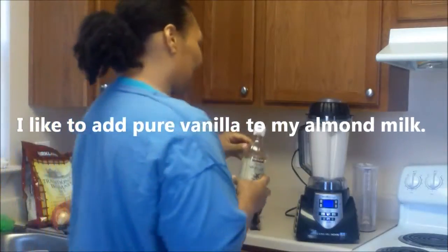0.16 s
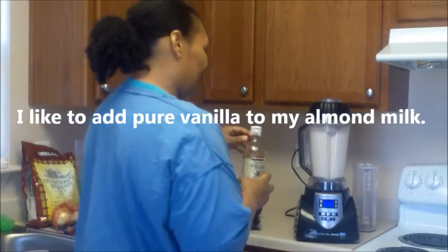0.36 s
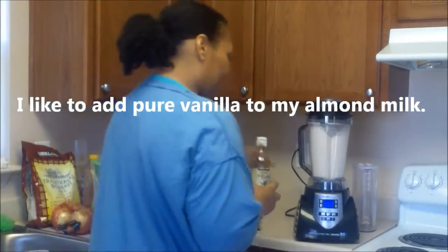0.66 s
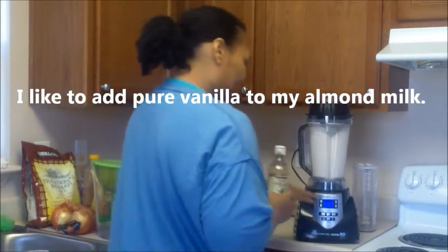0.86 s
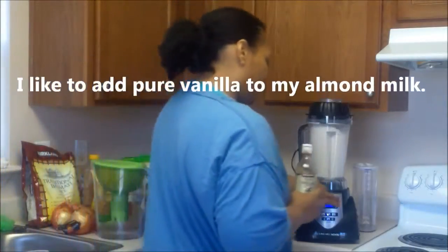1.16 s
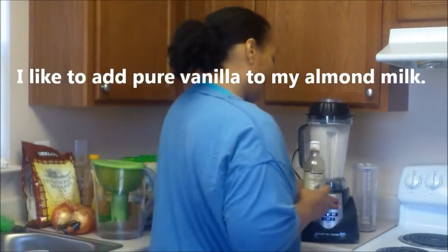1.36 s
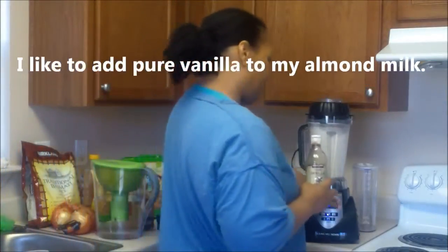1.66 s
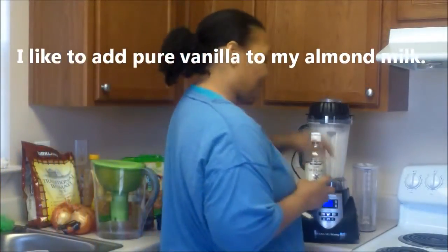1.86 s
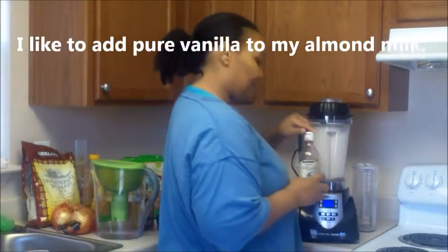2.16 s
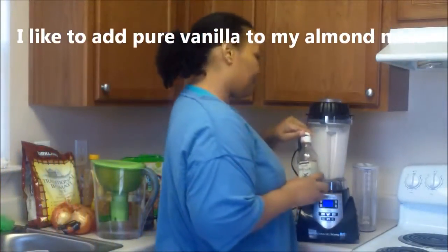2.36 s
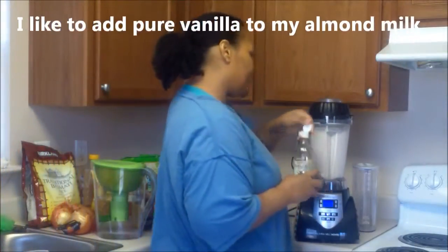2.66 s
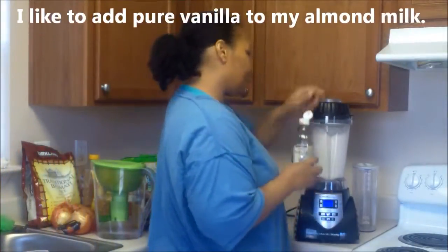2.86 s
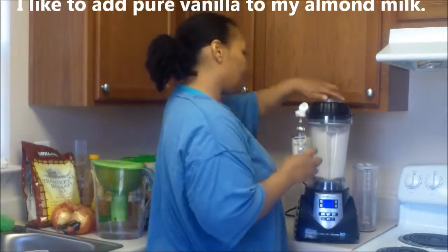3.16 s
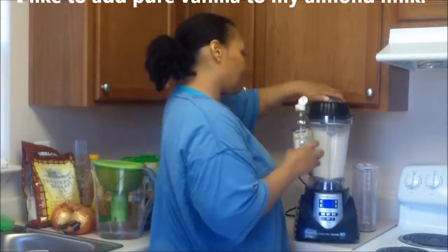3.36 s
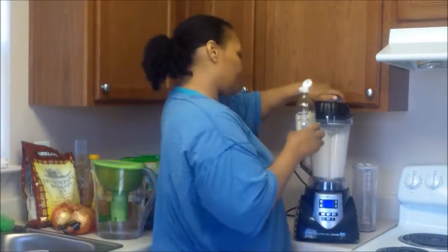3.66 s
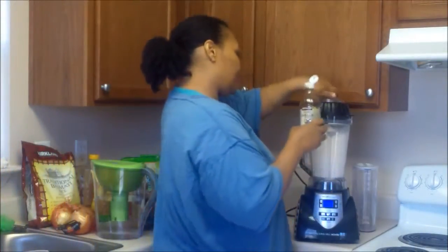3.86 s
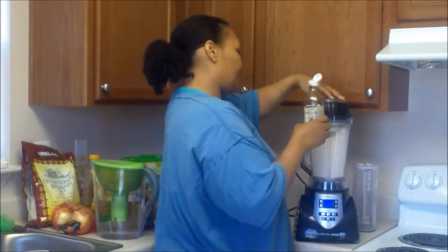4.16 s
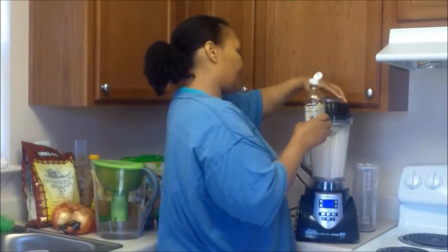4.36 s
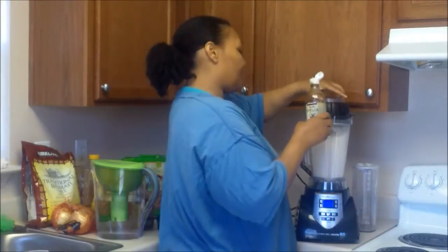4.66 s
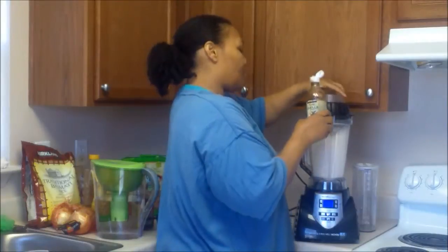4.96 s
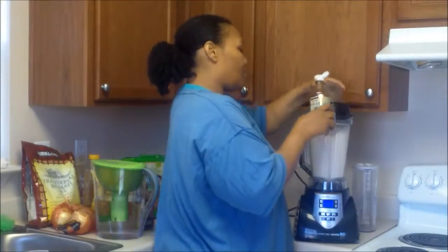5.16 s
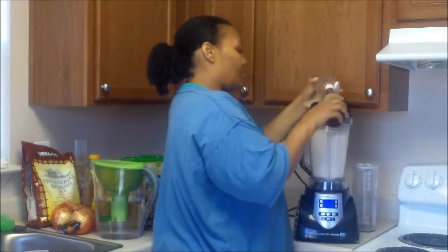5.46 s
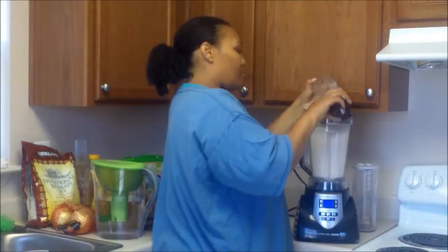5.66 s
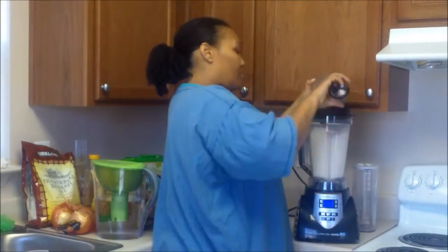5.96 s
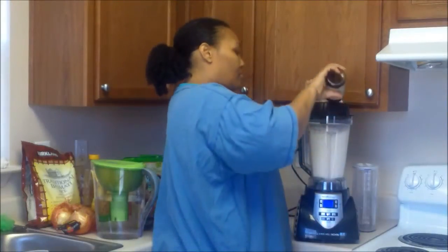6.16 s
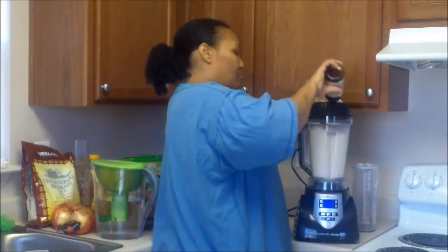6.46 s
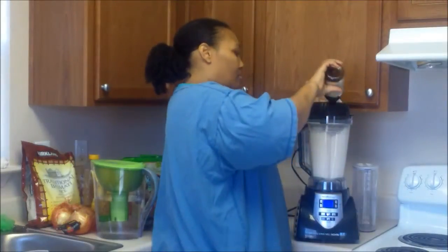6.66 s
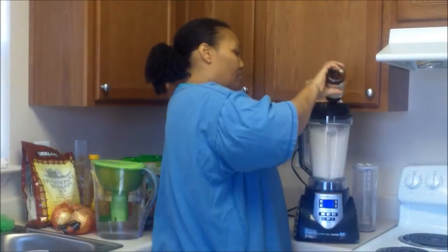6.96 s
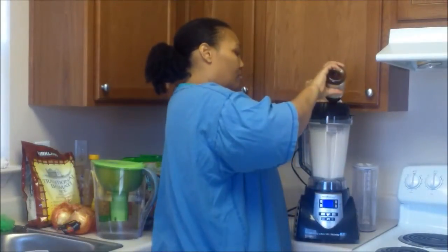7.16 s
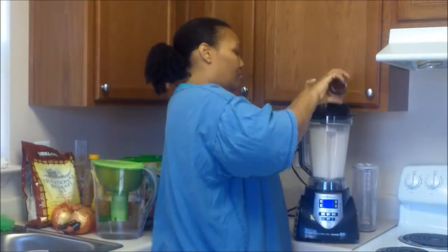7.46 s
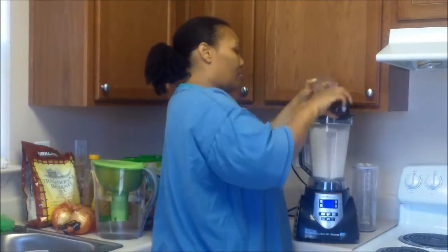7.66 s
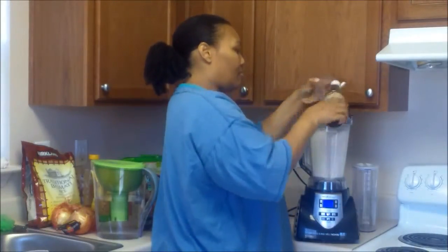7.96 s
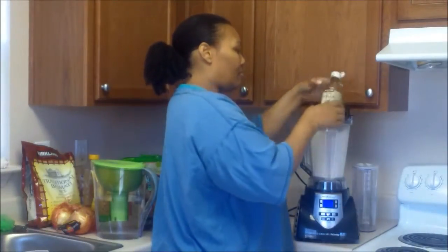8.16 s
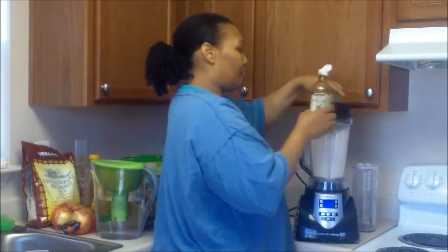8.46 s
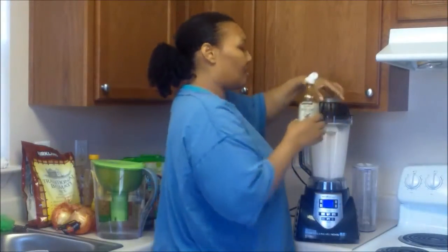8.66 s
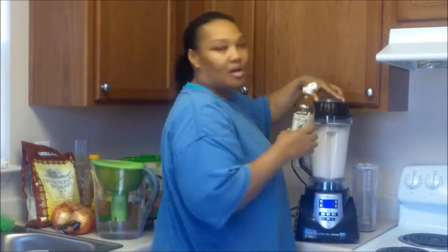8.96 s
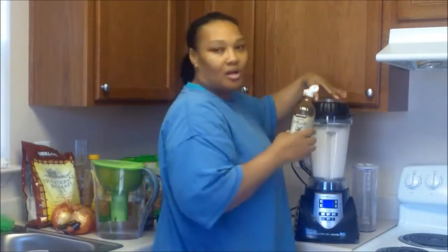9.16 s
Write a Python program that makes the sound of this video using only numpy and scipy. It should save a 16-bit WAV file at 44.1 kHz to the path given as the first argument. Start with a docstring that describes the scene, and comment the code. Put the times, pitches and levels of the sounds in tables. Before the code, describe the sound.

A kitchen blender runs at full speed without a break, a loud bright hissing roar over a wavering motor hum, close by in a small kitchen.

```python
"""Kitchen blender grinding nuts

A blender grinds nuts in water at full speed, a couple of metres from a single microphone.
The shaft hums and wavers with the load: a harmonic series on its turning speed.
Churned liquid and cooling fan roar through jar and housing: shaped noise, resonances and close echoes.
Jar air booms, mostly while the lid's cap is off, the jar wall rings and the counter rumbles: filtered noise."""
import sys
import numpy as np
from scipy import signal
from scipy.fft import rfft, irfft, next_fast_len
from scipy.io import wavfile
from scipy.ndimage import uniform_filter1d

SR = 44100
rng = np.random.default_rng(int(sys.argv[2]) if len(sys.argv) > 2 else 0)


def generate_wav(sig):
    """Save sig (samples, or channels by samples) to the path in sys.argv[1] as 16-bit PCM at SR."""
    pcm = np.round(np.clip(np.atleast_2d(sig).T, -1, 1) * 32767).astype(np.int16)
    wavfile.write(sys.argv[1], SR, pcm)


N = 410571

# Shaft speed under the changing load: t/s, f/Hz (turns per second)
SHAFT_SPEED = [(0.0, 291.0), (0.2, 295.5), (0.38, 299.0), (0.52, 297.2), (0.92, 298.0), (1.2, 295.7),
               (1.55, 290.5), (1.78, 290.8), (2.0, 295.3), (2.25, 296.5), (2.42, 300.0), (2.87, 295.2),
               (3.05, 296.5), (3.66, 296.0), (3.88, 298.4), (4.6, 297.7), (4.78, 296.5), (5.3, 296.8),
               (5.52, 304.0), (6.0, 302.9), (6.32, 299.7), (6.6, 299.4), (7.02, 295.2), (7.36, 295.2),
               (7.52, 296.8), (7.78, 291.8), (8.02, 298.2), (8.62, 300.6), (9.02, 298.1), (9.31, 293.8)]
# Multiples of shaft speed: unbalance, blade pair, third, four blade tips, commutator
SHAFT_MULTIPLES = (1, 2, 3, 4, 44)
# Hum at the shaft speed itself: t/s, level/dB
SHAFT_HUM = [(0.0, -35), (0.2, -26), (0.55, -28), (1.25, -29), (1.48, -37), (1.75, -44), (2.0, -32),
             (2.48, -28.5), (2.8, -32), (3.25, -28.5), (3.75, -37), (4.05, -31), (4.5, -32), (5.1, -27),
             (5.5, -32), (6.25, -27.5), (6.7, -30), (7.0, -28), (7.78, -26.5), (8.0, -34.5), (8.55, -33.5),
             (8.72, -27.5), (9.0, -31.5), (9.31, -33.5)]
# Usual level of each upper tone: multiple, level/dB
UPPER_TONE_DB = {2: -42, 3: -48, 4: -42, 44: -57}
# Stretches where an upper tone stands out: multiple, start t/s, duration/s, level/dB
TONE_SWELLS = [(2, 1.4, .5, -38), (2, 2.42, .2, -38), (2, 4.85, .3, -38), (2, 6.18, .3, -36),
               (2, 7.15, .2, -34), (2, 7.65, .3, -31), (2, 8.3, .3, -36.5), (2, 9.12, .3, -34),
               (3, 2.35, .3, -34), (3, 5.42, .75, -31), (3, 6.2, .5, -35), (3, 6.9, .55, -36),
               (3, 8.05, .35, -34), (4, .62, 1.25, -35.5), (4, 2.65, .25, -35), (4, 3.38, .25, -32),
               (4, 3.6, .95, -35.5), (4, 5.42, .2, -35), (4, 5.7, .25, -34), (4, 6.0, .2, -36),
               (4, 6.4, .4, -35), (4, 7.7, .7, -33), (4, 8.5, .7, -32), (44, -.1, .25, -49),
               (44, 1.05, .65, -46.5), (44, 1.78, .7, -49), (44, 2.8, .95, -49), (44, 4.55, .9, -51),
               (44, 5.6, .5, -50), (44, 6.35, .3, -48), (44, 6.8, 1.15, -47), (44, 8.95, .5, -47)]
# Fan and blade roar, the level of the fan noise: t/s, level/dB
ROAR_LEVEL = [(0.0, -13.5), (0.1, -12.5), (0.26, -15), (0.62, -15), (0.8, -14), (1.38, -13), (1.5, -14.5),
              (1.72, -15.5), (2.05, -13.5), (2.33, -13), (2.93, -13.5), (3.11, -13), (4.69, -13.5),
              (5.47, -12.5), (6.01, -14), (7.11, -12.5), (7.81, -14), (8.04, -13.5), (9.31, -13)]
# Fan noise spectrum: f/Hz, relative level/dB per Hz
FAN_SPECTRUM = [(1500, -8), (2200, -5), (3200, -4.5), (5000, -2), (6700, 0), (7350, -8), (8000, -9),
                (8600, -2), (10100, -9.5), (10700, -15), (12500, -20.5), (14000, -24), (15700, -24.5)]
# Churned liquid spectrum: f/Hz, relative level/dB per Hz
CHURN_SPECTRUM = [(120, -16.5), (200, -16.5), (240, -4), (320, -1.5), (450, -4), (650, -1), (1100, -0.5),
                  (1500, -0.5), (1850, -12.5), (2600, -7.5), (4000, -39)]
# Jar and housing resonances: f/Hz, width/Hz, level over the roar/dB
BODY_MODES = [(381, 33, 7.5), (915, 156, 5), (1040, 33, 5), (1690, 45, 7), (2032, 55, 6.5), (2397, 54, 6.5),
              (2512, 70, 3.5), (2623, 32, 5), (2717, 97, 1), (2843, 68, 4.5), (2950, 44, 5),
              (3424, 39, 5.5), (3780, 140, 3), (4045, 220, 2.5), (4850, 240, 1.5), (5230, 240, 2),
              (6240, 53, 2.5), (6550, 60, -1.5), (7740, 101, 2.5), (8500, 49, 1.5), (8670, 150, 2.5)]
# Reflections in the kitchen: delay t/s, level/dB
KITCHEN_ECHOES = [(.0041, -14), (.0093, -21), (0.0161, -16.5), (0.0287, -18), (.041, -16.5)]
# Sound let out of the jar's mouth: t/s, level/dB
BOOM_LEVEL = [(0.0, -41), (1.2, -41), (2.0, -36), (4.7, -36.5), (5.35, -30.5), (6.3, -30), (6.75, -29),
              (7.05, -26), (7.4, -26), (7.66, -28), (7.75, -22), (7.86, -21.5), (7.95, -28.5), (8.3, -30),
              (8.6, -35), (9.31, -35)]
# Resonances of the air in the jar: f/Hz, width/Hz, relative level/dB
JAR_AIR_MODES = [(342, 30, 0), (390, 50, -7), (500, 160, -11), (930, 120, -15)]
# Jar wall and churn: t/s, ring level/dB, churn level relative to the roar/dB
WALL_AND_CHURN = [(0.0, -26.5, -12), (0.4, -31.5, -12.5), (1.3, -27, -13), (1.7, -29.5, -12),
                  (2.4, -26, -13.5), (3.3, -25.5, -12), (4.3, -26.5, -12.5), (5.3, -27.5, -12.5),
                  (6.4, -28, -11.5), (7.0, -26.5, -12.5), (8.5, -28.5, -11.5), (9.31, -27, -12.5)]
# Resonances of the jar wall: f/Hz, width/Hz, relative level/dB
JAR_WALL_MODES = [(1405, 24, 1.5), (1467, 18, 2.5), (1545, 16, 3), (1463, 284, -3.5)]
# Counter rumble spectrum: f/Hz, relative level/dB per Hz
RUMBLE_SPECTRUM = [(10, 2), (16, 3), (25, -4), (38, -3), (60, -9), (110, -13.5), (200, -16), (400, -31)]

SWELL_EDGE_S = .08
BOOM_FLUTTER_DB, BOOM_FLUTTER_HZ = 2.0, 14
RUMBLE_DB = -46.5
TOP_HZ = 15760


def undb(db):
    """Amplitude ratio: 20 dB is a factor of ten."""
    return 10 ** (np.asarray(db) / 20)


def columns(table):
    """Linear interpolation in time: each column of a curve table, one value a sample."""
    times, *curves = np.transpose(table)
    t = np.arange(N) / SR
    return [np.interp(t, times, curve) for curve in curves]


def walk(rate_hz):
    """Smoothed random process: values held 1 / rate_hz seconds, averaged twice, spread near 1."""
    hold = int(SR / rate_hz)
    steps = np.repeat(rng.standard_normal(N // hold + 1), hold)
    smooth = uniform_filter1d(uniform_filter1d(steps, hold), hold)
    return 1.265 * smooth[:N]


def bins():
    """Discrete spectrum: bin frequencies in Hz, each one bin high so that a logarithm exists."""
    size = next_fast_len(N)
    return np.arange(1, size // 2 + 2) * SR / size


def shape(spectrum):
    """Spectral envelope: amplitude gain, with dB linear in log frequency."""
    hz, db = np.transpose(spectrum)
    return undb(np.interp(np.log(bins()), np.log(hz), db, left=-90, right=-90))


def resonance(hz, width_hz):
    """Resonance peak: amplitude gain 1 at the centre, one half at the edges of the width."""
    detuning = 2 * (bins() - hz) / width_hz
    return 1 / (1 + detuning ** 2)


def noise(gain):
    """Filtered noise: white noise multiplied by a gain per frequency."""
    size = next_fast_len(N)
    spectrum = rfft(rng.standard_normal(size))
    return irfft(spectrum * gain, size)[:N]


def unit(x):
    """Normalization to an effective (RMS) value of 1."""
    return x / np.sqrt(np.mean(x ** 2))


def ringing(modes):
    """Forced resonance: noise heard only through a set of modes whose powers add."""
    power = sum((undb(db) * resonance(hz, width_hz)) ** 2 for hz, width_hz, db in modes)
    return unit(noise(np.sqrt(power)))


def swell_ramp(start_s, length_s):
    """Trapezoidal envelope: from 0 to 1 and back, each ramp centred on an edge of the stretch."""
    t = np.arange(N) / SR
    inside_s = np.minimum(t - start_s, start_s + length_s - t)
    return np.clip(inside_s / SWELL_EDGE_S + .5, 0, 1)


def tone_levels():
    """Partial levels in dB: the hum, then upper tones rising at times above their usual level."""
    levels = columns(SHAFT_HUM)
    for multiple, quiet in UPPER_TONE_DB.items():
        rises = [(db - quiet) * swell_ramp(start_s, length_s)
                 for m, start_s, length_s, db in TONE_SWELLS if round(m) == multiple]
        levels.append(quiet + np.max(rises, axis=0))
    return levels


def motor():
    """Harmonics of rotation: lumps meeting the blades shake a shared pitch and each tone's level."""
    hz, = columns(SHAFT_SPEED)
    shaken_hz = hz * (1 + .0013 * walk(22))
    phase = 2 * np.pi * np.cumsum(shaken_hz) / SR
    out = 0
    for multiple, db in zip(SHAFT_MULTIPLES, tone_levels()):
        amplitude = np.sqrt(2) * undb(db + 1.98 * walk(16))  # levels are RMS
        out = out + amplitude * np.sin(multiple * phase + 2 * np.pi * rng.random())
    return out


def roar(spectrum, lo_hz, hi_hz, flicker_db=.6, swell_db=.6):
    """Turbulent noise: fluttering octave-spaced bands, plus body modes each swelling on its own."""
    colour, octave, out = shape(spectrum), np.log2(bins()), 0
    for centre in np.arange(6.5, 14.6):  # log2 of f/Hz
        # Neighbouring bands overlap with constant total power.
        band = np.cos(np.pi / 2 * np.clip(octave - centre, -1, 1))
        out = out + undb(flicker_db * walk(9)) * noise(colour * band)
    for hz, width_hz, db in BODY_MODES:
        if lo_hz <= hz < hi_hz:
            # Extra power above the roar; a mode at or below 0 dB adds nothing.
            lift = np.sqrt(max(undb(2 * db) - 1, 0))
            mode = noise(colour * resonance(hz, width_hz))
            out = out + lift * undb(swell_db * walk(1.42)) * mode
    return unit(out)


def kitchen(x):
    """Reflection off counter and cupboards: delays shift slightly as the cook moves."""
    now = np.arange(N)
    out = x
    for delay_s, db in KITCHEN_ECHOES:
        moving_delay_s = delay_s + .0001 * walk(.794)
        out = out + undb(db) * np.interp(now - SR * moving_delay_s, now, x, period=N)
    return out


def cooling_fan(level_db):
    """Flow noise: the fan's broad roar, with the upper jar and housing modes and echoes."""
    return undb(level_db) * unit(kitchen(roar(FAN_SPECTRUM, 1900, 16000)))


def churned_liquid(level_db):
    """Liquid turbulence: a lower roar, with the lower jar and housing modes and echoes."""
    return undb(level_db) * unit(kitchen(roar(CHURN_SPECTRUM, 100, 1900)))


def jar_air():
    """Cavity resonance: enclosed air booms with a fluttering level through the jar's mouth."""
    level_db, = columns(BOOM_LEVEL)
    flutter_db = BOOM_FLUTTER_DB * walk(BOOM_FLUTTER_HZ)
    return undb(level_db + flutter_db) * ringing(JAR_AIR_MODES)


def jar_wall(level_db):
    """Shell vibration: noise rings through the modes of the jar wall."""
    return undb(level_db) * ringing(JAR_WALL_MODES)


def counter_rumble():
    """Structure-borne sound: steady low noise from the counter."""
    return undb(RUMBLE_DB) * unit(noise(shape(RUMBLE_SPECTRUM)))


def scene():
    """Superposition: all sources add, identical in both channels."""
    roar_db, = columns(ROAR_LEVEL)
    wall_db, churn_db = columns(WALL_AND_CHURN)
    machine = motor() + cooling_fan(roar_db) + churned_liquid(roar_db + churn_db)
    jar = jar_air() + jar_wall(wall_db)
    return np.tile(machine + jar + counter_rumble(), (2, 1))


def record(dry):
    """Saturation and band limiting: the input rounds high peaks, then a low-pass cuts the top."""
    soft = dry / (1 + dry ** 8) ** (1 / 8)
    low_pass = signal.ellip(10, .2, 80, TOP_HZ, fs=SR, output="sos")  # ripple/dB, stopband/dB
    return signal.sosfilt(low_pass, soft)


dry = scene()
out = record(dry)
generate_wav(out)
```